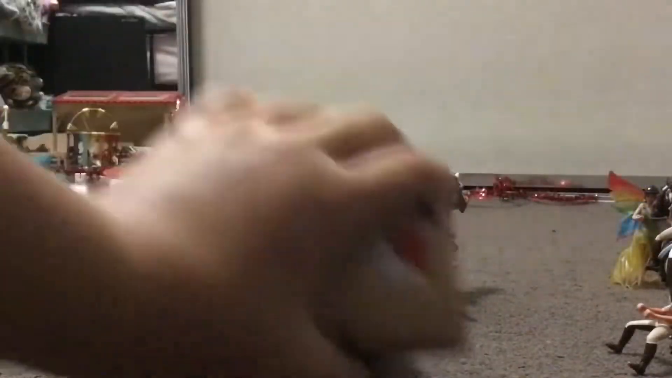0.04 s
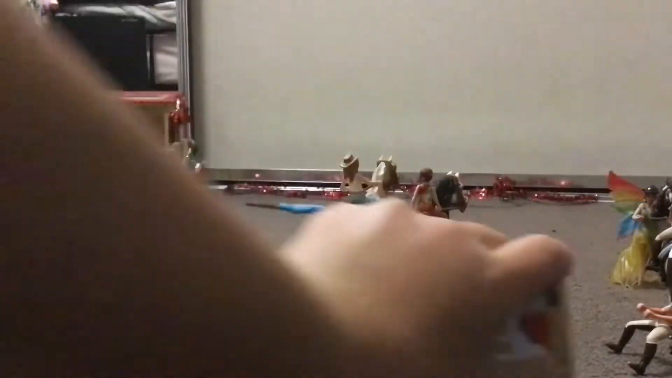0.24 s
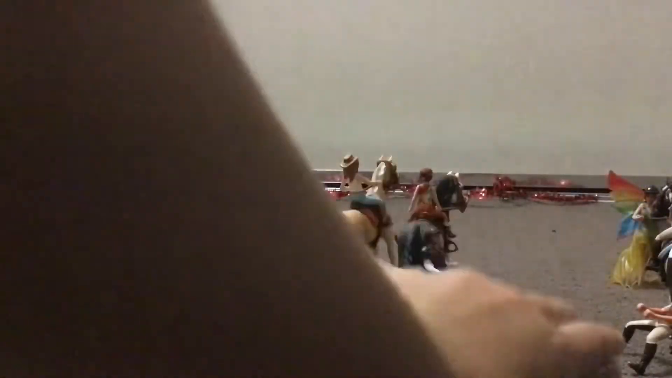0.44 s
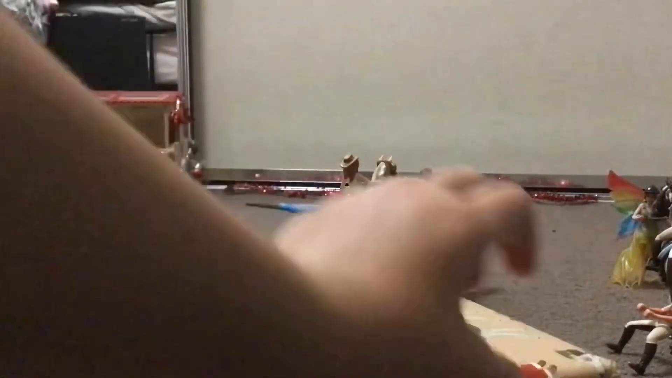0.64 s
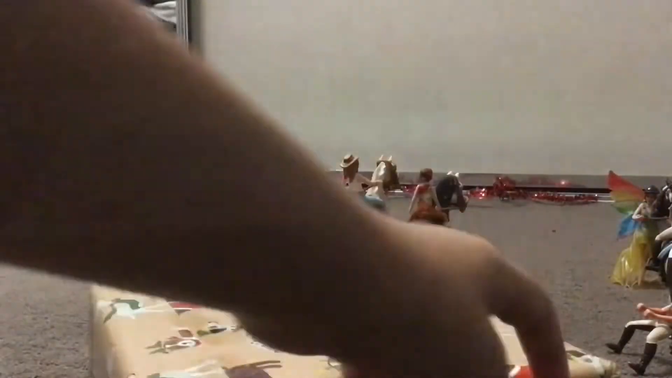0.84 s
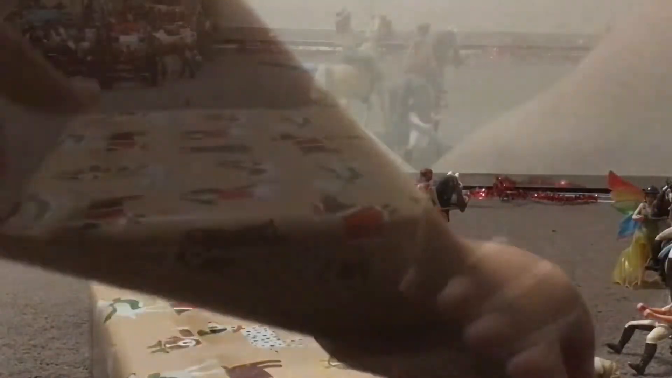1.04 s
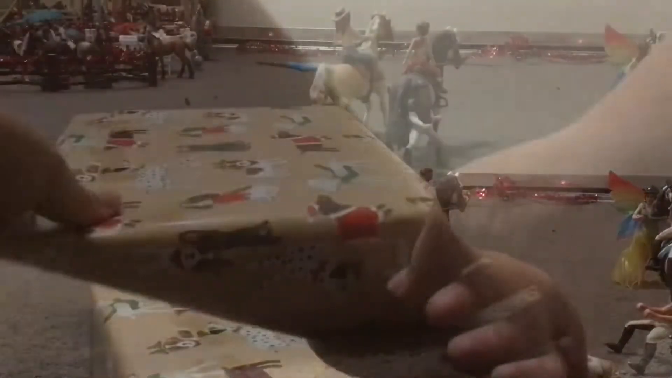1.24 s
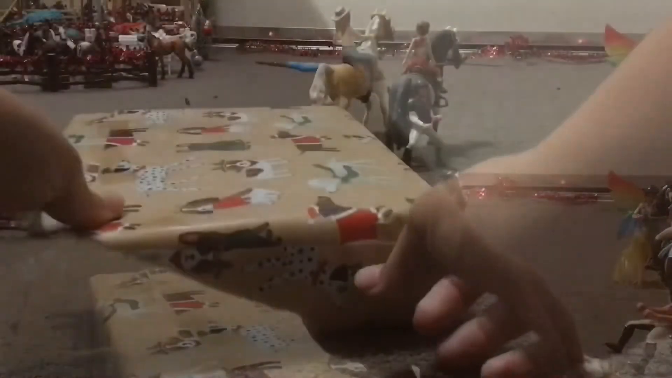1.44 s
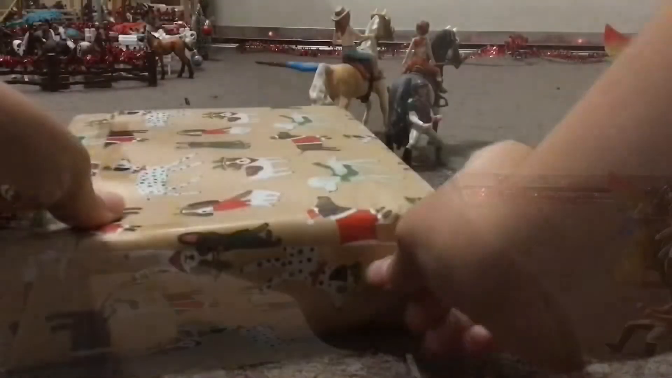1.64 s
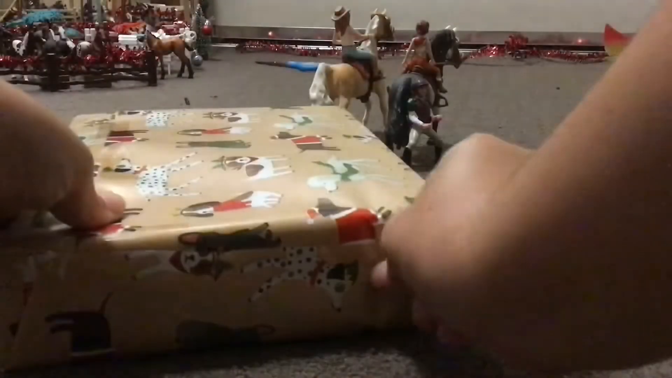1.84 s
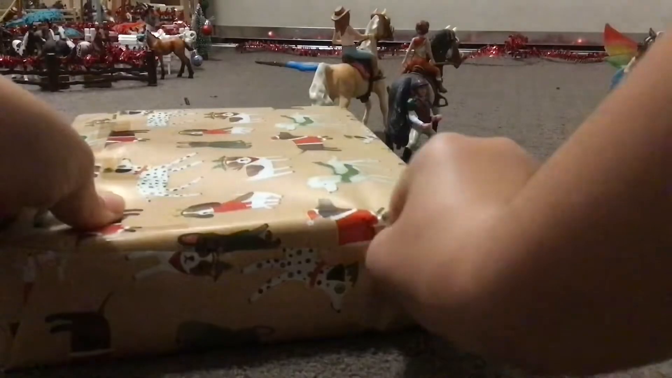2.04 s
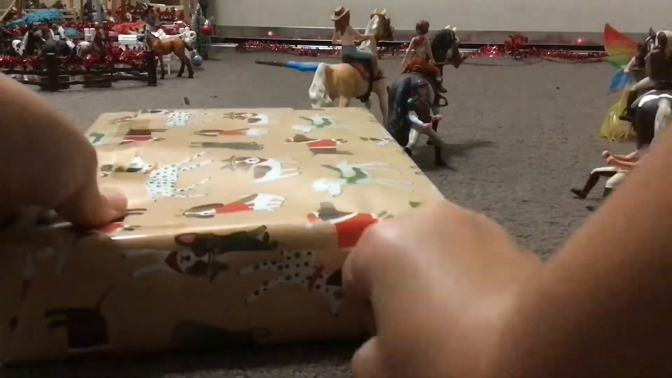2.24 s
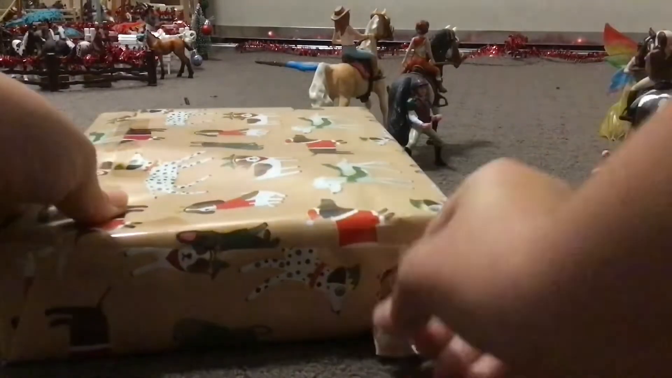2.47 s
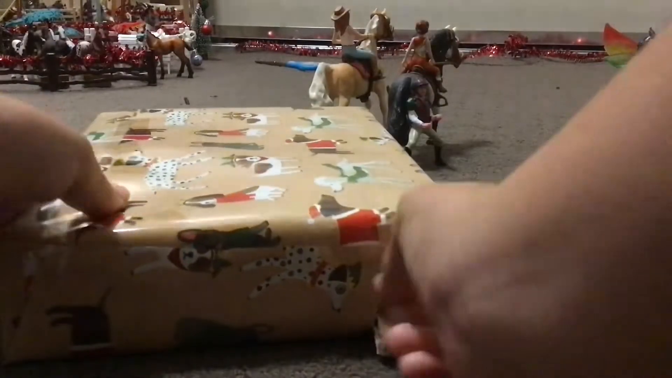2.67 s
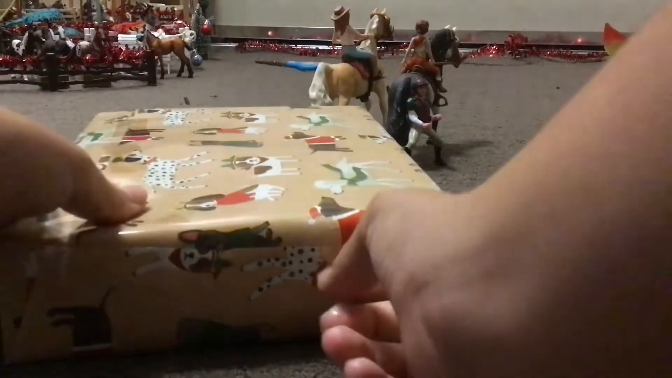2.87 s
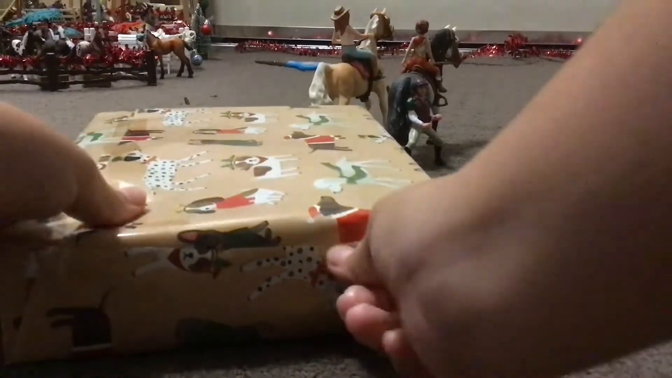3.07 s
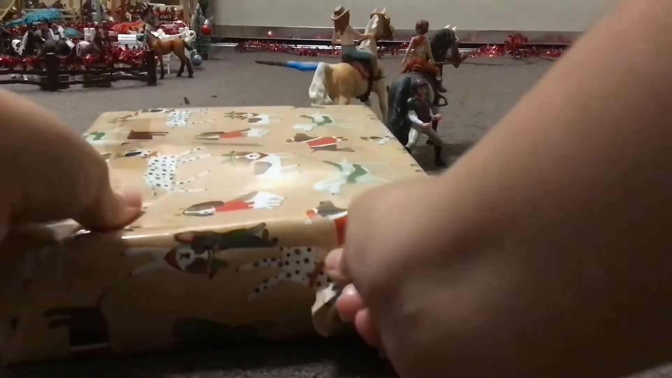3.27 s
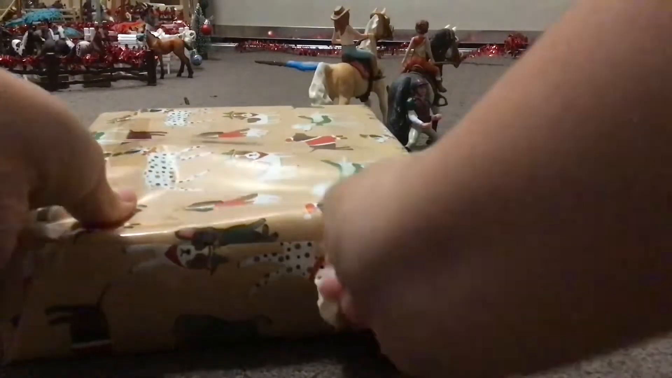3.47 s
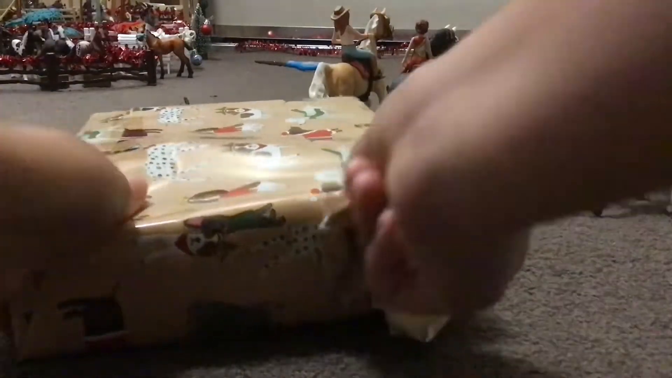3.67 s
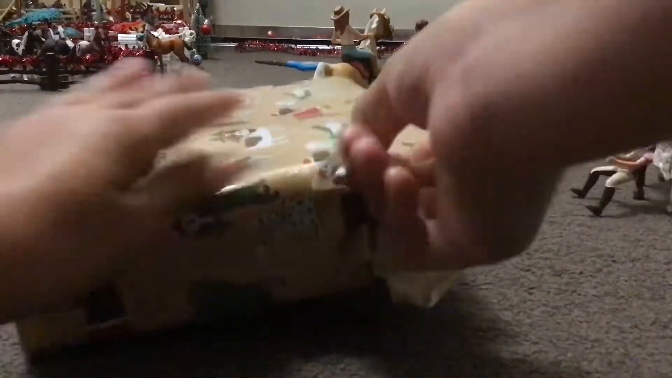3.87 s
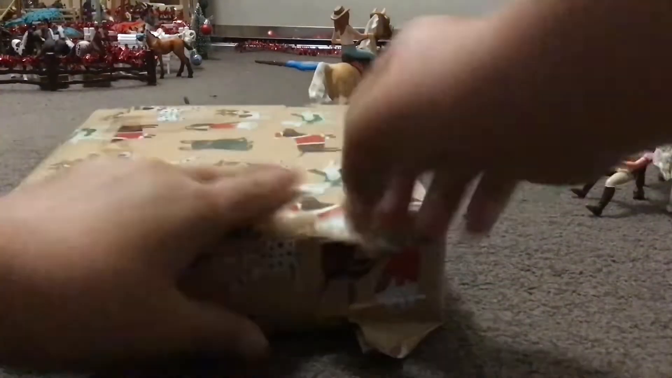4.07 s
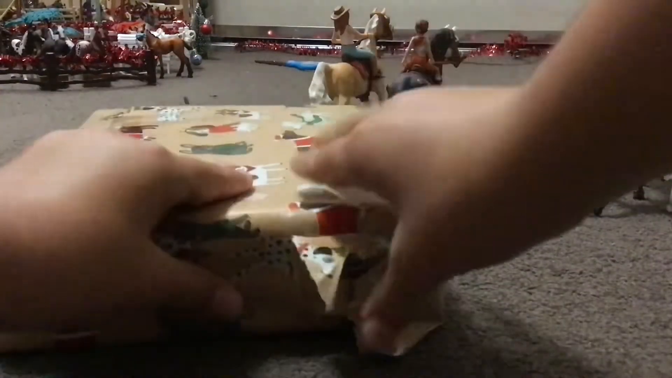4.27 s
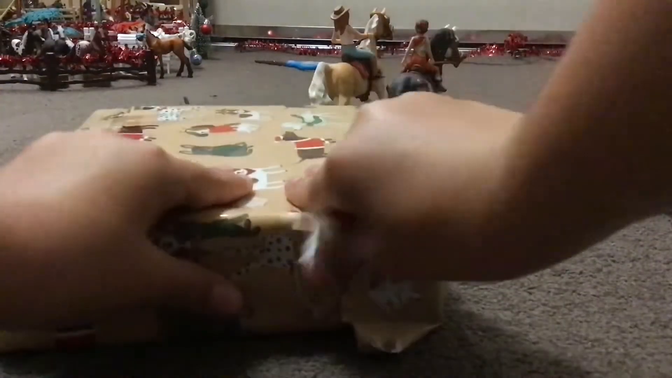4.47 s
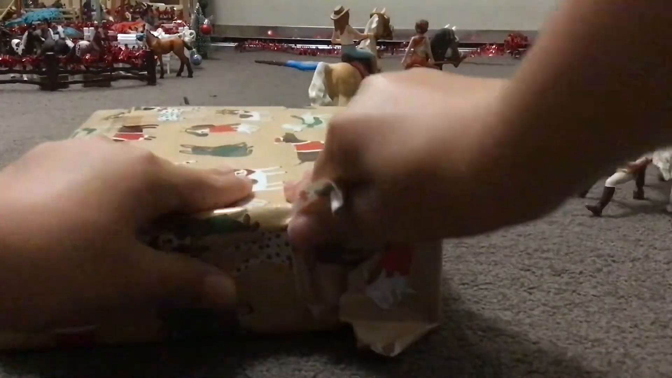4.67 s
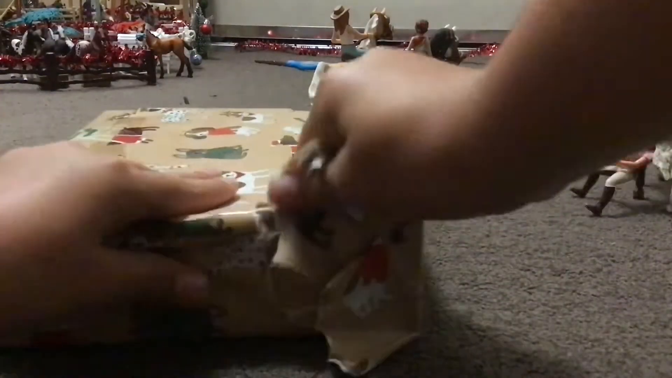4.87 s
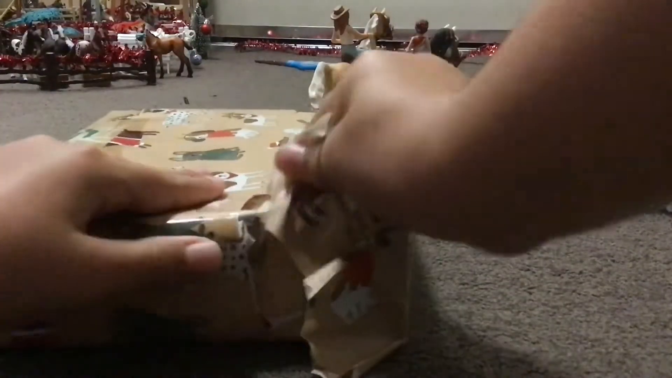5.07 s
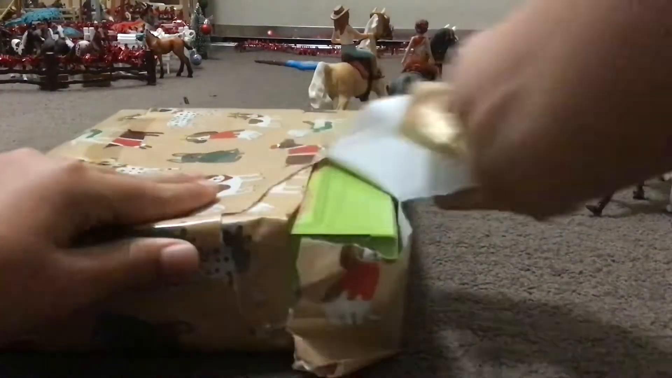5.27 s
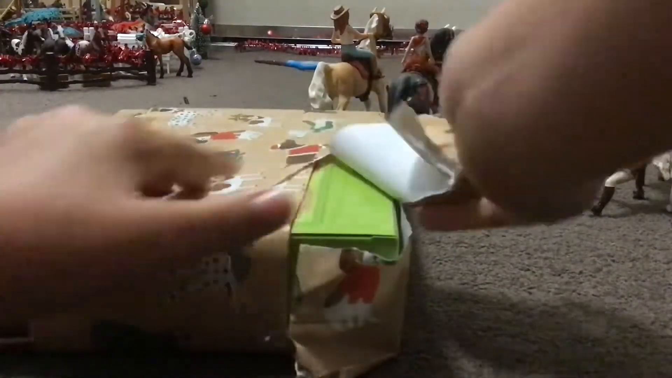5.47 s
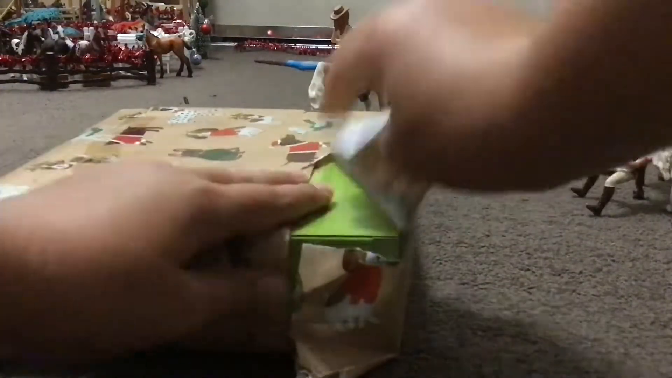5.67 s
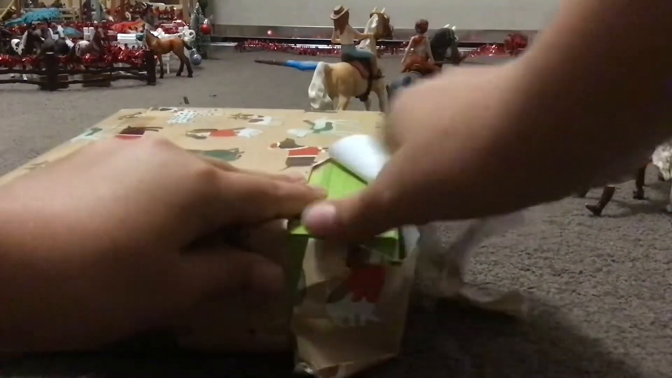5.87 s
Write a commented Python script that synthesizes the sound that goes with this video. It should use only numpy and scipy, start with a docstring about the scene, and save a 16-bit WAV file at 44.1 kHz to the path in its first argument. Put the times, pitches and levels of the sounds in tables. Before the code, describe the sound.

Close to a small thin-sounding microphone in a quiet carpeted room, hands brush a wrapped cardboard box and set it down with a soft thump. Faint ticks and light scuffing follow, then tape slips, crisp crackles and paper snaps thicken around three seconds. Short rips and crumples build to the loudest tear just after five seconds, with low box knocks, then lighter rustling.

```python
"""A soft brush of hands on paper comes first, as a wrapped cardboard box is turned over on a carpet;
then the hands pick at the paper, tear it and crumple it. Creases snap as short ringing noise bursts,
tears run as showers of fibre clicks, and rubbing is noise coloured by the air pocket under the sheet.
The hollow box answers pushes with short low thumps; a quiet room, made of shaped noise, hums underneath."""
import sys
import numpy as np
from scipy import signal
from scipy.fft import rfft, irfft
from scipy.io import wavfile

SR = 44100
rng = np.random.default_rng(int(sys.argv[2]) if len(sys.argv) > 2 else 0)


def generate_wav(sig):
    """Save sig (samples, or channels by samples) to the path in sys.argv[1] as 16-bit PCM at SR."""
    pcm = np.round(np.clip(np.atleast_2d(sig).T, -1, 1) * 32767).astype(np.int16)
    wavfile.write(sys.argv[1], SR, pcm)


N = 261072   # length [samples]

# hands resting and shifting on the parcel:
# (time [s], fine crackle [dB], pocket rustle minus crackle [dB], box rumble [dB])
RESTING_TOUCH = [(0.0, -63, -2, -53), (0.19, -61, -4, -59), (0.44, -58, -13, -65), (0.52, -92.5, 11.5, -67),
                 (0.95, -65.5, -11.5, -58), (1.18, -74.5, 1.5, -64), (1.6, -76, 7, -56),
                 (1.92, -65, -7, -54.5), (2.1, -52, -10.5, -55), (2.32, -72.5, 4.5, -59),
                 (2.6, -70, 0, -58), (2.85, -59, -2, -48), (3.65, -51, -11, -50.5), (3.75, -64, 2.5, -55.5),
                 (4.03, -55, -4.5, -48.5), (4.28, -77.5, 1.5, -57.5), (4.45, -60, -4.5, -47.5),
                 (4.95, -44, -8, -44), (5.48, -62.5, -7.5, -55), (5.75, -53, -6, -52),
                 (5.92, -68.5, -0.5, -47.5)]
# rips and rubs laid over that touch:
# (time at full strength [s], hold [s], crackle [dB], pocket rustle minus crackle [dB], box rumble [dB])
RIPS_AND_RUBS = [(0.005, 0.028, -48.5, -10, -62), (0.262, 0.029, -50, -11, -48),
                 (.37, 0.074, -56.5, -14, -53), (0.422, 0.012, -53, 6, -27), (1.239, 0.037, -79.5, 16, -46),
                 (1.317, 0.016, -83, 30.5, -52), (1.39, 0.062, -67, -18, -57.5),
                 (1.688, 0.0092, -58, 3, -47.5), (2.116, 0.046, -39, 0.5, -39),
                 (2.41, 0.078, -67.5, 12.5, -58), (2.697, 0.13, -51.5, -1, -56),
                 (2.977, 0.018, -51.5, 2, -37), (3.096, 0.022, -44.5, -1, -52),
                 (3.2, 0.031, -41.5, 5.5, -36.5), (3.375, 0.031, -56, 5.5, -41.5),
                 (3.554, 0.04, -47, -2, -57), (3.648, 0.019, -50, 2, -61), (3.784, 0.021, -56, -19, -49.5),
                 (3.932, 0.038, -52, 0.5, -40), (4.084, 0.0026, -46, 3, -46),
                 (4.322, 0.11, -56.5, -1, -46.5), (4.485, 0.084, -46, -7.5, -42.5),
                 (4.711, 0.18, -41, -6, -43.5), (4.839, 0.026, -31, -19, -62),
                 (5.016, 0.081, -37.5, -5.5, -46.5), (5.147, 0.068, -24, -8, -33),
                 (5.24, 0.028, -35, -8.5, -45), (5.718, 0.045, -49, -3.5, -56),
                 (5.8, 0.055, -56, -4, -49.5)]
RISE_DB_PER_S, FADE_DB_PER_S = 1300, 518   # every stroke starts fast and dies more slowly

# tone of the crackle: (frequency [Hz], relative density [dB per Hz])
CRACKLE_TONE = [(900, -70), (2500, -2.5), (8000, -1.5), (14000, -2), (16000, 2.5)]
# air pocket between paper and box: (frequency [Hz], width [Hz], relative gain [dB])
POCKET_MODES = [(746, 135, 8.5), (1510, 474, 8.5), (2293, 460, 3), (4100, 1300, -1.5)]
PICKING_S = 1.5   # until then palms only slide over the paper
# the flap is torn open and the pocket rings less: time [s], share of open rubbing [0-1]
OPENED_S, OPEN_SHARE = 3.8, .8
# the box scuffs into place: (start [s], end [s])
DRAG_SPAN = (1.24, 1.355)
# colour of that scuff: (frequency [Hz], width [Hz])
DRAG_MODES = [(1200, 470), (3300, 180)]

# creases and tape letting go: (time [s], peak [dB], ring pitch [Hz], pocket ring minus burst [dB])
CREASE_SNAPS = [(0.2253, -32.5, 2630, -4), (0.2597, -18, 4670, -8), (0.4255, -29, 2580, 12),
                (0.8271, -48.5, 2520, -5), (0.8876, -45.5, 2450, 20), (0.9562, -40, 2360, 7),
                (1.081, -51.5, 2400, 15), (1.2237, -42.5, 2080, -3), (1.2388, -40, 2700, 15),
                (1.2985, -39.5, 3500, 5), (1.3609, -46, 2280, 12), (1.3848, -28, 4400, -5),
                (1.4133, -37.5, 2370, 24), (1.4457, -43, 2300, 20), (1.4685, -38.5, 6100, 3.5),
                (1.6013, -34, 4970, -5.5), (1.6448, -40, 4030, 8), (1.668, -36.5, 2400, 6),
                (1.6575, -41, 2200, 17), (1.7, -32.5, 3200, 11), (1.747, -41.5, 2410, 18),
                (1.7829, -29, 1920, 7), (1.806, -34.5, 4080, -7), (2.1202, -17, 3900, 0.5),
                (2.2272, -36, 2190, 16), (2.4043, -38, 1950, 8), (2.7397, -36, 2400, 6),
                (2.755, -17.5, 2200, -2.5), (2.8106, -30, 2630, -8), (2.8693, -27.5, 2190, -30),
                (2.8956, -24.5, 4340, -1.5), (2.9831, -18.5, 12600, 2), (3.0021, -21, 11900, -1.5),
                (3.048, -32.5, 2370, 2), (3.1139, -29, 2480, 6), (3.135, -32.5, 4300, 23),
                (3.149, -18, 4430, 1), (3.2021, -9, 12300, -3), (3.222, -15.5, 2480, -2.5),
                (3.2563, -34, 2370, 9), (3.3145, -26.5, 2400, -0.5), (3.3314, -25.5, 2020, 5),
                (3.3525, -30, 2500, 7), (3.3698, -17, 2640, -4.5), (3.384, -31, 2400, 13),
                (3.39, -32, 4300, -11), (3.4009, -26, 2460, -11), (3.4416, -19, 1890, -34),
                (3.4626, -24.5, 2470, -25), (3.488, -24.5, 2020, -22), (3.497, -28, 6900, -3.5),
                (3.507, -23.5, 10200, -19), (3.544, -29, 1390, 2), (3.561, -24, 2600, -15),
                (3.5869, -24.5, 2550, -33), (3.6044, -27.5, 6450, -10.5), (3.6652, -24, 6360, -8),
                (3.7777, -20, 2840, -11.5), (3.9363, -25, 2320, -29), (3.955, -28.5, 2670, 7),
                (4.043, -31.5, 4150, -3.5), (4.0918, -27, 2010, 12), (4.2076, -39.5, 2180, 3),
                (4.253, -38.5, 2180, 6.5), (4.331, -30.5, 2010, 28), (4.449, -28.5, 2180, 9),
                (4.486, -32.5, 2530, 13), (4.5142, -31.5, 2400, -2), (4.557, -21.5, 12300, -7),
                (4.589, -32, 3900, 12), (4.7763, -19, 2360, -23), (4.801, -18.5, 6440, -28),
                (4.8427, -15.5, 4630, -9), (4.9283, -27.5, 2540, -20), (5.0111, -23, 5030, -15),
                (5.0415, -20.5, 6190, -19), (5.0632, -14, 2480, -27), (5.1283, -20.5, 8400, 5),
                (5.142, -8.5, 9700, -4.5), (5.3056, -22, 7900, -13.5), (5.3647, -25, 3170, -0.5),
                (5.419, -22.5, 4600, -4), (5.5802, -24, 5230, -9.5), (5.636, -31.5, 3140, 2),
                (5.663, -39, 3000, 9), (5.767, -30, 6000, 5), (5.786, -29, 6960, -2),
                (5.7999, -28.5, 5070, -13)]
# tape and paper give in jerks; each slip ticks and then jolts the wall: (time [s], jolt peak [dB])
TAPE_SLIPS = [(0.9723, -36.5), (1.812, -38.5), (1.8363, -40), (1.867, -38), (1.885, -43), (1.9044, -35.5),
              (1.9264, -51), (1.9425, -33.5), (1.961, -41), (1.9790, -35.5), (2.0176, -36.5), (2.049, -33),
              (2.0746, -31), (2.094, -29), (2.63, -37.5), (2.905, -34), (2.921, -40), (2.9391, -33),
              (2.955, -37), (4.607, -34), (4.623, -31.5), (4.638, -28), (4.656, -28.5), (4.676, -31),
              (4.693, -29), (4.715, -28.5)]
JOLT_AFTER_S, JOLT_HZ = 0.00485, 255
# tick: level against the jolt [dB], ring pitch [Hz], pocket ring minus burst [dB]
TICK_DB, TICK_HZ, TICK_POCKET_DB = -7.5, 2300, 39

# tone of the murmuring walls: (frequency [Hz], relative density [dB per Hz])
RUMBLE_TONE = [(40, -26), (85, -7), (180, 3), (400, 0), (700, -11.5), (950, -20), (1600, -59)]
# pushes and knocks on the box: (time of the swell's peak [s], swell peak [dB], pitch [Hz])
BOX_PUSHES = [(0.264, -29, 350), (0.431, -22, 277), (1.235, -30, 230), (2.408, -35.5, 580),
              (2.758, -33.5, 393), (2.987, -30.5, 290), (3.073, -32, 600), (3.206, -27, 410),
              (3.229, -31.5, 290), (3.392, -26, 410), (3.779, -33, 494), (4.096, -32, 340),
              (4.493, -32.5, 380), (5.074, -30, 283), (5.149, -20.5, 350), (5.215, -26, 202),
              (5.234, -20.5, 180), (5.811, -34, 330)]
# the box set down: (time [s], blow level [dB])
LANDINGS = [(0.42, -24), (1.23, -34), (3.948, -29.5), (5.231, -23.5)]
# wall modes those blows ring: (frequency [Hz], gain [dB], time to fall 60 dB [s])
WALL_MODES = [(84.4, 3, 0.041), (285, -18, 0.21), (446, -18, 0.068)]

# tone of the room hum: (frequency [Hz], relative density [dB per Hz])
ROOM_TONE = [(30, -4), (80, 4.5), (220, 0.5), (430, -16.5), (1000, -38), (7500, -38.5), (16000, -42)]
ROOM_DB = -61.5   # rms level of the hum
ROOM_T60_S, ECHO_DB = 0.15, -18
CUTOFF_HZ = 16839   # treble is fully cut from here up


def handling():
    """Crackle, pocket share and rumble in dB: strokes rise, hold and fall over the resting touch."""
    t = np.arange(0, N + 64, 64) / SR
    touch_s, *columns = np.transpose(RESTING_TOUCH)
    crackle, pocket, box = [np.interp(t, touch_s, c) for c in columns]
    power = amp([crackle, crackle + pocket, box]) ** 2
    for s, held_s, crackle_db, pocket_db, box_db in RIPS_AND_RUBS:
        rise_loss = RISE_DB_PER_S * np.maximum(s - t, 0)
        fade_loss = FADE_DB_PER_S * np.maximum(t - s - held_s, 0)
        full_db = np.array([[crackle_db], [crackle_db + pocket_db], [box_db]])
        power = power + amp(full_db - rise_loss - fade_loss) ** 2
    every_sample = np.arange(N) / SR
    crackle, pocket, box = [np.interp(every_sample, t, 10 * np.log10(p)) for p in power]
    return crackle, pocket - crackle, box


def rustle(crackle_db, pocket_db):
    """Crinkles and fibre clicks in clumps over the hiss of skin on paper; a running tear is their loudest form."""
    patchy = np.clip((-30.0 - crackle_db) / 15, .3, 1)   # a fast tear runs evenly, slow picking in fits
    patchy[:round(PICKING_S * SR)] *= .35
    clumps = amp(4.4 * patchy * np.clip(drift(55.0), -2, 2))
    small = patchy * crinkles(250.)

    fibres = 1.16 * grains(2500., 4.7)
    hiss = .35 * rng.standard_normal(N)
    bright = coloured(small + fibres + hiss, CRACKLE_TONE)

    rubbing = 0.95 * small + .5 * grains(900., 3.7) + .5 * rng.standard_normal(N)
    open_band = signal.butter(2, (450, 3200), "band", fs=SR, output="sos")
    broad = rms_one(signal.sosfilt(open_band, rubbing))
    opened = OPEN_SHARE * (np.arange(N) > OPENED_S * SR)
    pocket = (1 - opened) * rms_one(hollow(rubbing)) + opened * broad

    dragged = rms_one(sum(resonance(rubbing, hz, width_hz) for hz, width_hz in DRAG_MODES))
    span = slice(round(DRAG_SPAN[0] * SR), round(DRAG_SPAN[1] * SR))
    pocket[span] = dragged[span]
    return amp(crackle_db) * clumps * (bright + amp(pocket_db) * pocket)


def crinkles(per_s):
    """Small creases: millisecond bursts, each through a broad ring at one of eight pitches; rms 1."""
    pitches = np.geomspace(1500, 13000, 8)
    fade = np.exp(-1 / (0.0016 * SR))
    out = 0
    for hz in pitches:
        clicks = np.abs(grains(per_s / len(pitches), 4.2)) + 1e-18
        bursts = signal.lfilter([1], [1, -fade], clicks)
        ringing = resonance(bursts * rng.standard_normal(N), hz, 0.22 * hz)
        out = out + rms_one(ringing) * np.sqrt(hz)
    return rms_one(out)


def hollow(x):
    """The air pocket under the paper colours whatever happens over it; dips fall between its modes."""
    modes = sum(amp(db) * resonance(x, hz, width_hz) for hz, width_hz, db in POCKET_MODES)
    return signal.sosfilt(signal.butter(2, 4500, fs=SR, output="sos"), modes)


def snaps():
    """A crease buckles in about two milliseconds: a bright burst with a ring of its own, and the pocket."""
    out, t = np.zeros(N), np.arange(SR // 40) / SR
    ticks = [(s, db + TICK_DB, TICK_HZ, TICK_POCKET_DB) for s, db in TAPE_SLIPS]
    creases = list(CREASE_SNAPS) + ticks
    noise = rng.standard_normal((len(creases), len(t)))
    thin = signal.butter(2, 1500, "high", fs=SR, output="sos")
    rise = np.minimum(1, t / 0.00043)
    decay = np.exp(-t / 0.00082) + 0.19 * np.exp(-t / 0.0033)
    for (s, db, hz, pocket_db), n in zip(creases, noise):
        burst = n * rise * decay
        ring = 3.3 * resonance(burst, hz, 0.21 * hz)
        bright = signal.sosfilt(thin, burst + ring)
        piece = rms_one(bright) + amp(pocket_db) * rms_one(hollow(burst))
        add(out, s, amp(db) * piece / np.abs(piece).max())
    return out


def rumble(rumble_db):
    """Small uneven pushes keep the box walls murmuring."""
    pushes = grains(200., 1.0) + 0.61 * rng.standard_normal(N)
    return amp(rumble_db + 2.7 * drift(12.7)) * coloured(pushes, RUMBLE_TONE)


def thumps():
    """A soft push bends a wall for a cycle or two: a sine that swells fast and dies."""
    out, swell = np.zeros(N), .55   # cycles up to the swell's peak
    jolts = [(s + JOLT_AFTER_S, db, JOLT_HZ) for s, db in TAPE_SLIPS]
    pushes = list(BOX_PUSHES) + jolts
    signs = rng.choice([-1, 1], (len(pushes), 1))   # walls bend in or out
    for (s, db, hz), (sign,) in zip(pushes, signs):
        cycles = np.arange(round(5 * SR / hz)) * hz / SR
        envelope = (cycles / swell) * np.exp(1 - cycles / swell)
        swing = np.sin(2 * np.pi * cycles) * envelope
        add(out, s - swell / hz, sign * amp(db) * swing)
    return out


def set_down():
    """The whole box lands on the carpet: a soft contact into its wall modes, and a dull scuff."""
    blows, out = np.full(N, 1e-18), 0
    blows[[round(s * SR) for s, db in LANDINGS]] = amp(np.array(LANDINGS)[:, 1])
    for hz, db, t60 in WALL_MODES:
        r, w = amp(-60 / (t60 * SR)), 2 * np.pi * hz / SR
        out = out + amp(db) * signal.lfilter([0, np.sin(w)], [1, -2 * r * np.cos(w), r * r], blows)
    dying = signal.lfilter([1], [1, -amp(-60 / (.09 * SR))], blows)   # falls 60 dB in 90 ms
    scuff = amp(-4) * dying * rng.standard_normal(N)
    return signal.sosfilt(signal.butter(2, 1200, fs=SR, output="sos"), out + scuff)


def echoes(x):
    """A short dry room: a dying spray of reflections after a few milliseconds."""
    t = np.arange(round(ROOM_T60_S * SR)) / SR
    tail = rng.standard_normal(len(t)) * amp(-60 * t / ROOM_T60_S) * (t > .004)
    return signal.fftconvolve(x, tail / np.sqrt(np.sum(tail ** 2)))[:N]


def room_hum():
    """The quiet room: steady noise weighted to the lows."""
    return amp(ROOM_DB) * coloured(rng.standard_normal(N), ROOM_TONE)


def amp(db):
    """dB to gain."""
    return 10 ** (np.asarray(db) / 20)


def rms_one(x):
    """Scale to rms 1."""
    return x / np.sqrt(np.mean(x ** 2) + 1e-20)


def coloured(x, spectrum):
    """Shape a dense sound by a (frequency [Hz], gain [dB]) curve; rms 1."""
    hz = np.maximum(np.fft.rfftfreq(N, 1 / SR), 1)
    points = np.array(spectrum)
    gain_db = np.interp(np.log(hz), np.log(points[:, 0]), points[:, 1])
    return rms_one(irfft(rfft(x) * amp(gain_db), N))


def drift(rate):
    """Slow chance with rms 1: noise smoothed twice at a rate in Hz."""
    r = np.exp(-2 * np.pi * rate / SR)
    noise = rng.standard_normal(N + SR)   # the first second lets the filter settle
    return rms_one(signal.lfilter([1], [1, -2 * r, r * r], noise)[SR:])


def grains(per_s, spread_db):
    """Random clicks of unequal size; rms 1."""
    sizes = amp(spread_db * np.minimum(rng.exponential(1, N), 2)) * rng.choice([-1, 1], N)
    return rms_one(sizes * (rng.random(N) < per_s / SR) + 1e-18)


def resonance(x, hz, width_hz):
    """Two-pole peak with gain 1 on top."""
    r = np.exp(-np.pi * width_hz / SR)
    poles = [1, -2 * r * np.cos(2 * np.pi * hz / SR), r * r]
    return signal.lfilter([(1 - r * r) / 2, 0, (r * r - 1) / 2], poles, x)


def add(out, s, piece):
    """Mix a piece in at s seconds."""
    at = max(round(s * SR), 0)
    out[at:at + len(piece)] += piece[:N - at]


def scene():
    """Paper and box close by, with the room around them."""
    crackle_db, pocket_db, rumble_db = handling()
    paper = rustle(crackle_db, pocket_db) + snaps()
    box = rumble(rumble_db) + thumps() + set_down()
    near = paper + box
    return (near + amp(ECHO_DB) * echoes(near) + room_hum())[None]


def record(dry):
    """A small microphone without deep bass, its loudest peaks rounded; the top is cut."""
    thin = signal.sosfilt(signal.butter(4, 50, "high", fs=SR, output="sos"), dry)
    rounded = .5 * np.tanh(thin / .5)
    return signal.sosfilt(signal.cheby2(12, 70, CUTOFF_HZ, fs=SR, output="sos"), rounded)


dry = scene()
out = record(dry)
generate_wav(out)
```